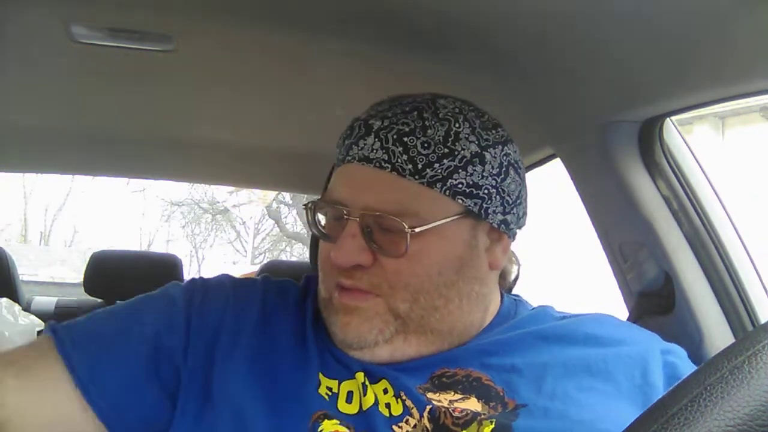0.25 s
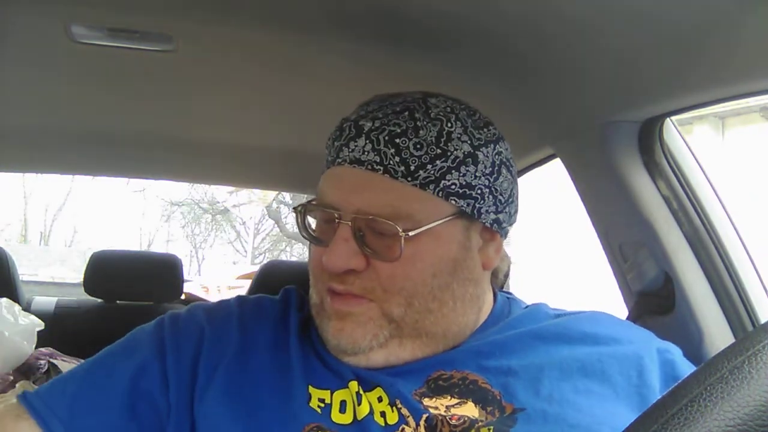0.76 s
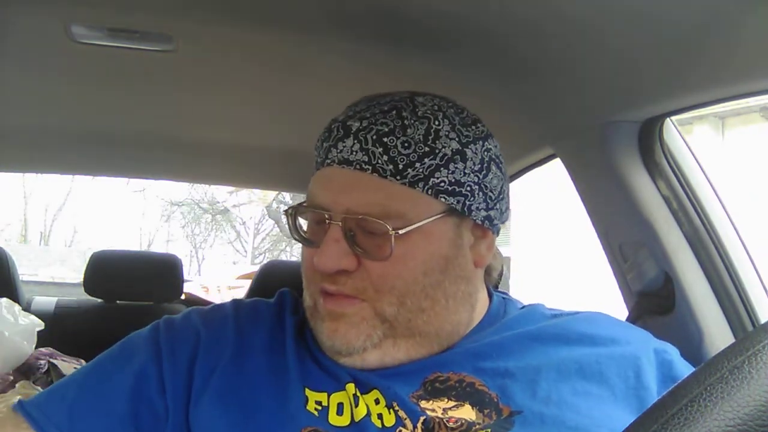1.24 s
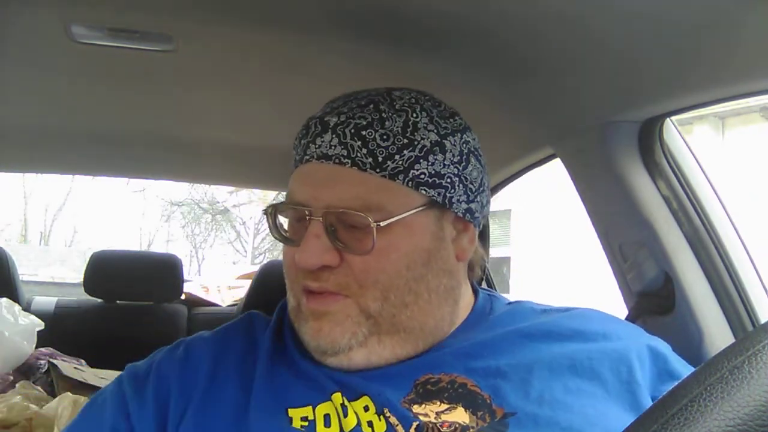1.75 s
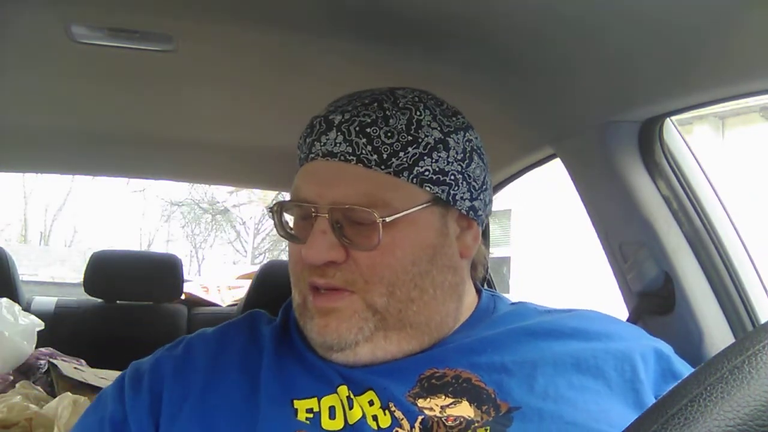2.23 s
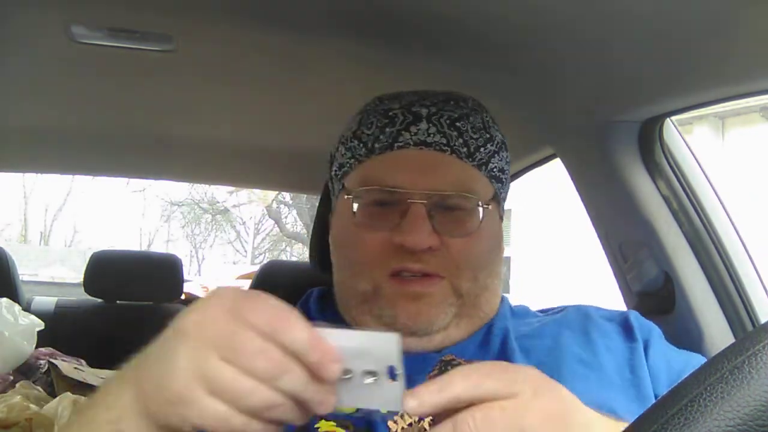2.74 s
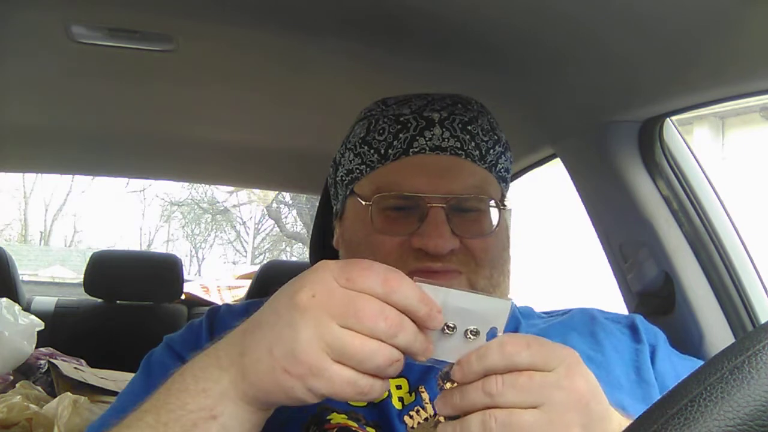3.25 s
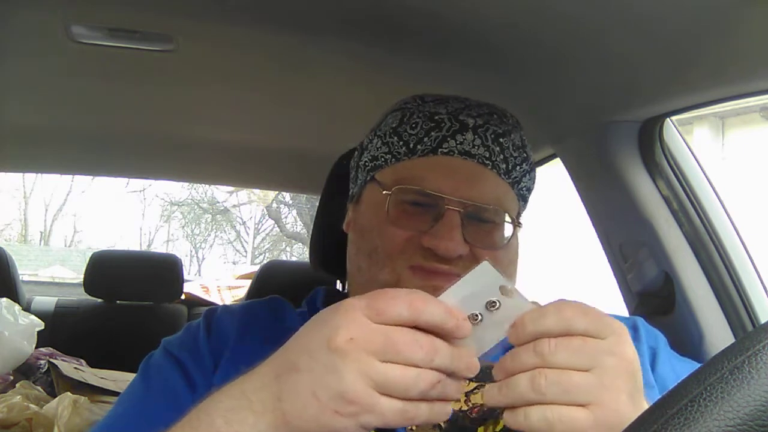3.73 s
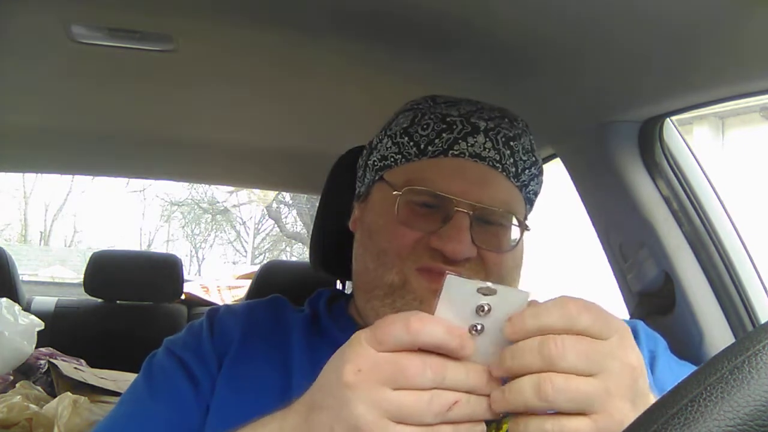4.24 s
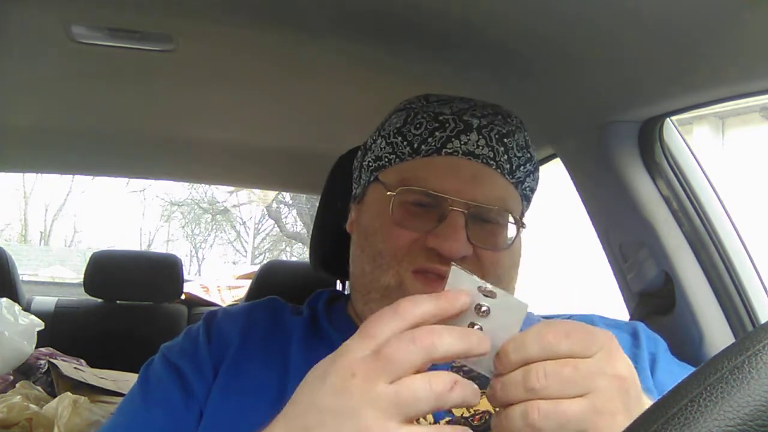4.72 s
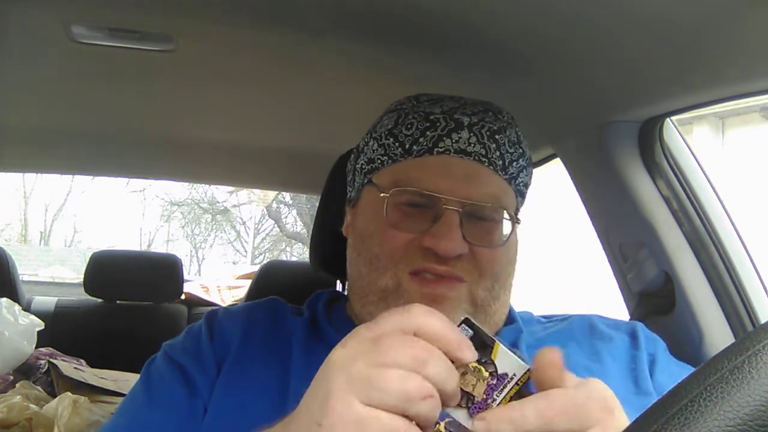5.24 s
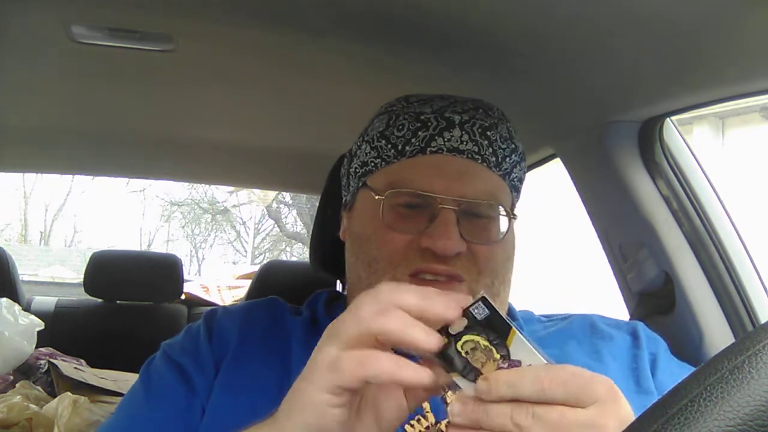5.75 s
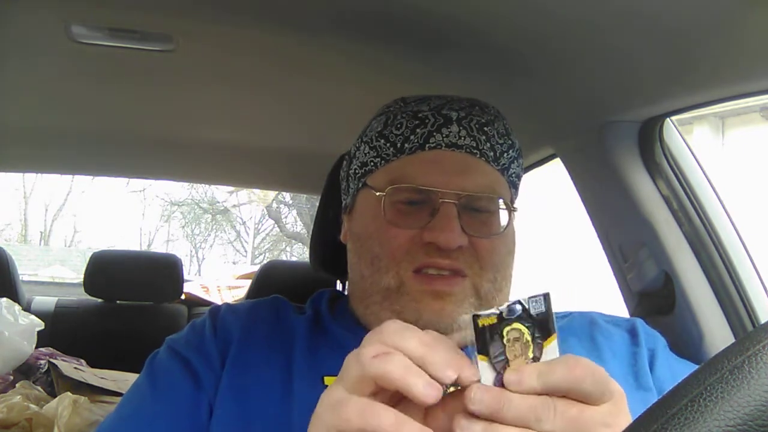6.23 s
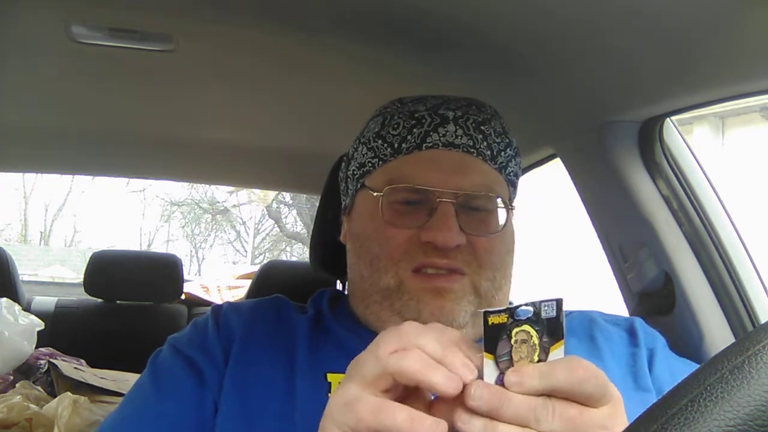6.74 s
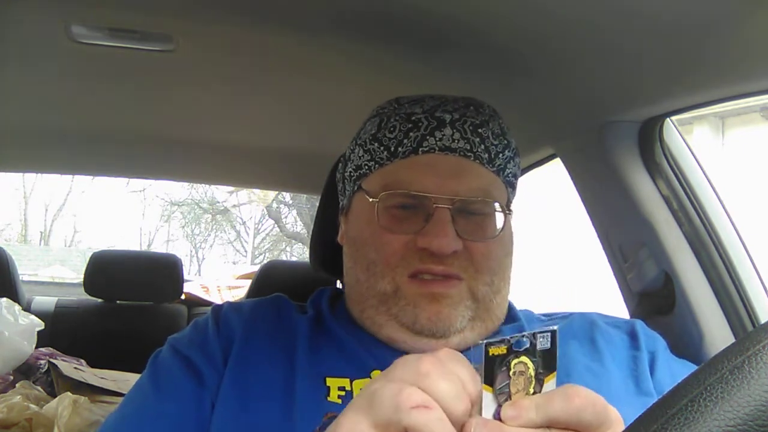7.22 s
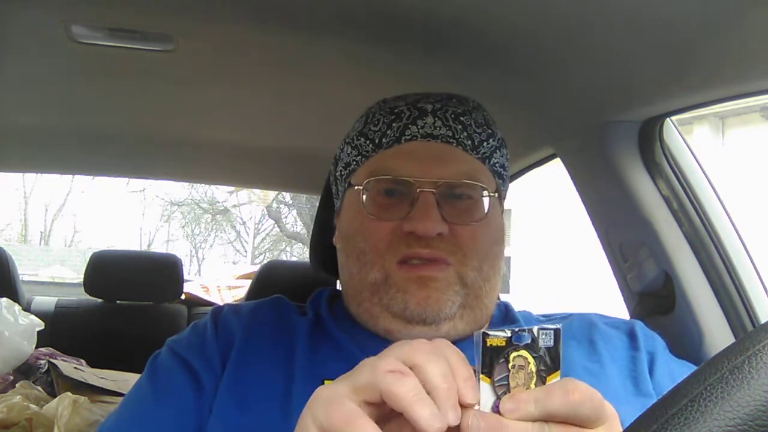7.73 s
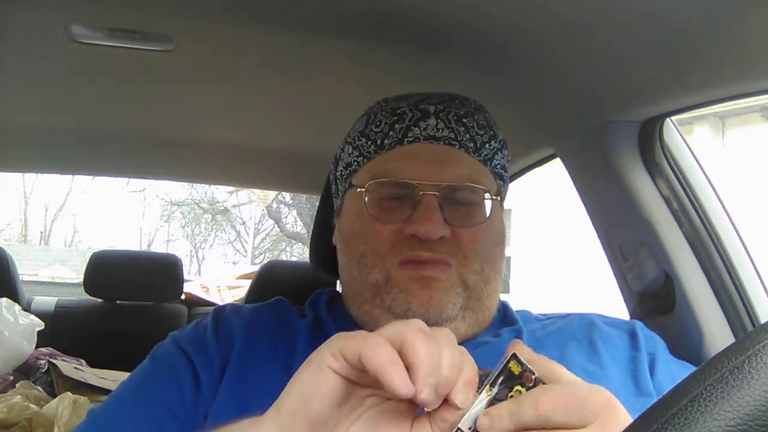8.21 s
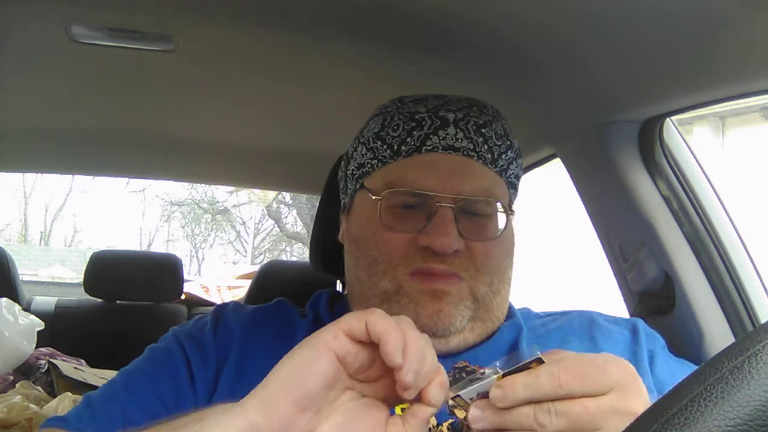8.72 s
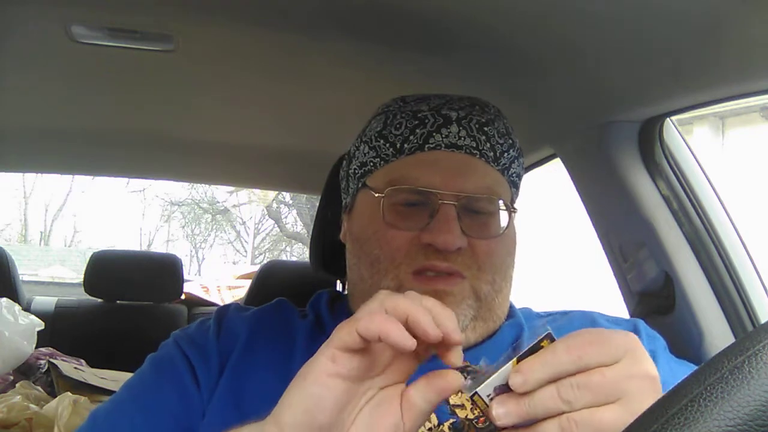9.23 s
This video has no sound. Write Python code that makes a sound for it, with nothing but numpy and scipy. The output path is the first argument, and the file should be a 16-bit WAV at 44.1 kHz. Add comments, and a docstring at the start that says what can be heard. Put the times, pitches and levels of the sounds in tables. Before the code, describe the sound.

Small plastic wrapper crackles and snaps in irregular bursts as hands work it open inside a quiet parked car, after a few dull knocks.

```python
"""A small card's plastic wrapper snaps and crackles as hands work it open in a parked car.
Each crease is a spike with a quick spray of noise; sliding film is a dense train of tiny slips.
In the first two seconds or so, among the first creases, hands also knock on seat and console (noise bursts
with decaying modes) and an arm brushes the seat; this, a sleeve, a thumb and the cabin are filtered noise.
All is heard by two microphone ports near the dashboard, alike in the bass and unlike in the treble."""
import sys
import numpy as np
from scipy import signal
from scipy.fft import rfft, irfft, next_fast_len
from scipy.io import wavfile
from scipy.ndimage import uniform_filter1d

SR = 44100
rng = np.random.default_rng(int(sys.argv[2]) if len(sys.argv) > 2 else 0)


def wav_record(signal):
    """Record a signal, one row per channel, as 16-bit PCM in the file named by sys.argv[1]."""
    frames = np.transpose(np.atleast_2d(signal))
    bounded = np.clip(frames, -1, 1)
    # unit amplitude maps onto the largest positive 16-bit level
    quanta = np.round(bounded * 32767).astype(np.int16)
    wavfile.write(sys.argv[1], SR, quanta)


N = 417627
TIME = np.arange(N) / SR
# the wrapper is held and fingered lightly between these times [s]
HELD_FROM_S, HELD_TO_S = 3.6, 7.1


def undb(db):
    """Amplitude ratio: 20 dB is a factor of ten."""
    return 10 ** (np.asarray(db) / 20)


def unit(x):
    """Normalisation to a root mean square of 1."""
    return x / np.sqrt(np.mean(x ** 2))


def colour(points, hz):
    """Spectral envelope: gain from (frequency [Hz], level [dB]) points joined on a log frequency axis."""
    f, db = np.transpose(points)
    return undb(np.interp(np.log(hz + 1), np.log(f), db))


def bins(size):
    """Fourier frequencies [Hz] of a real spectrum."""
    return np.fft.rfftfreq(next_fast_len(size), 1 / SR)


def shaped(x, gain):
    """Linear filtering: multiplication of the spectrum by a gain per frequency."""
    size = next_fast_len(x.shape[-1])
    return irfft(rfft(x, size) * gain, size)[..., :x.shape[-1]]


def causal(gain):
    """Minimum-phase response by cepstral folding, so that nothing sounds before the blow."""
    cepstrum = irfft(np.log(gain + 1e-5))
    half = cepstrum.shape[-1] // 2
    cepstrum[..., 1:half] *= 2
    cepstrum[..., half + 1:] = 0
    return np.exp(rfft(cepstrum))


def ports(x, alike_hz=1900, lag_ms=0.2707):
    """Spatial coherence: two unrelated signals become alike in the bass, with a time lag at the left port."""
    hz = bins(x.shape[-1])
    size = next_fast_len(x.shape[-1])
    alike = 1 / (1 + (hz / alike_hz) ** 2)
    left, right = rfft(x, size)
    left = alike * right + np.sqrt(1 - alike ** 2) * left
    left = left * np.exp(-2j * np.pi * hz * lag_ms / 1000)
    return irfft(np.array([left, right]), size)[:, :x.shape[-1]]


def swell(start, length, attack_s, t60):
    """Gesture envelope: a linear rise that ends at the start, a hold, then exponential decay."""
    rise = np.clip(1 + (TIME - start) / attack_s, 0, 1)
    return rise * 1000 ** -np.clip((TIME - start - length) / t60, 0, 3)


def wander(rate):
    """Slow random modulation: normal draws at a rate [Hz], joined by straight lines."""
    steps = np.arange(0, N / SR, 1 / rate)
    return np.interp(TIME, steps, rng.standard_normal(N)[:len(steps)])


def add(out, s, sound):
    """Superposition: a sound is mixed in at time s."""
    i = min(max(int(s * SR), 0), N - 1)
    out[:, i:i + sound.shape[1]] += sound[:, :N - i]


def wrapper(hz):
    """Radiation of film and card: a broad spectrum raised or lowered by resonances, at unit mean power."""
    # colour of the film: (frequency [Hz], relative level [dB])
    film_colour = [(150, -61), (250, -29.5), (510, -21), (615, -14), (729, -24.5), (850, -19.5),
                   (1440, -10), (2310, -4.5), (2990, -12.5), (3360, -9), (4410, -5.5), (6530, 1.5),
                   (12200, -2), (13500, -3.5), (14500, -13)]
    # resonances of the card in the cupped hands: (frequency [Hz], width [Hz], gain [dB])
    card_modes = [(640, 200, 2.5), (870, 44, 3.5), (1444, 460, -7.5), (2400, 480, -2), (6600, 300, 1.5)]
    resonance_db = sum(db / (1 + (2 * (hz - f) / width) ** 2) for f, width, db in card_modes)
    bass_cut = hz ** 2 / (hz ** 2 + 180 ** 2)
    return unit(colour(film_colour, hz) * undb(resonance_db) * bass_cut)


def facet(hz, swing_db=5, width=0.057, count=14):
    """Local resonance: a patch of bent film has peaks and dead spots, each a given share of its pitch wide."""
    draws = rng.random((count, 2))
    centres = 1100 * (14000 / 1100) ** draws[:, :1]
    peaks = 1 / (1 + ((hz - centres) / (centres * width / 2)) ** 2)
    gain = undb(swing_db * np.cos(np.pi * draws[:, 1]) @ peaks)
    # the resonances only share out the energy of their part of the spectrum
    return gain / np.sqrt(uniform_filter1d(gain ** 2, len(hz) // 9))


def stutter(hz, spread_ms=2.8, slip_db=-10, count=3):
    """Interference of delayed slips: smaller ones crowd round the main one, tending to come after it."""
    delays_s = (rng.standard_normal((count, 1)) + 1 / 2) * spread_ms / 1000
    delayed = np.exp(-2j * np.pi * hz * delays_s)
    slips = 1 + undb(slip_db) * rng.standard_normal(count) @ delayed
    return slips / np.sqrt(np.mean(np.abs(slips) ** 2))


def crack(t60, tail_db, tail_t60, direct=0.6, patchy_db=0.5, size=8192):
    """Two-stage decay: a snap's spike and lumpy quick spray of noise, then a faint, slower-fading tail."""
    t = np.arange(size) / SR
    lumps = undb(patchy_db * np.repeat(rng.standard_normal((2, size // 16)), 16, axis=1))
    fall = undb(-60 * t / t60)
    early = rng.standard_normal((2, size)) * unit(lumps) * fall
    early[:, 2] += direct * np.array([1, 2])
    early *= np.sqrt(np.sum(fall ** 2) / np.sum(early ** 2, axis=1, keepdims=True))
    tail = undb(tail_db - 60 * t / tail_t60) * rng.standard_normal((2, size))
    return ports(early + tail)


def ticks(per_s=5, level_db=-51, spread_db=-0.5, middle_db=-5, body_db=-8, pan_db=3):
    """Poisson process: small stray creases at random moments of holding, as rows like those of the snaps."""
    chance = rng.standard_normal((128, 2))
    times = HELD_FROM_S + np.cumsum(rng.exponential(size=128)) / per_s
    return [(s, level_db + spread_db * a, middle_db, body_db, pan_db * b)
            for s, (a, b) in zip(times, chance) if s < HELD_TO_S]


def snaps(size=8192):
    """Buckling: each crease gives way as an impulse and drives film and card by its own spectrum."""
    # the creases that stand out:
    # (time [s], relative level [dB], middle band [dB], card body [dB], left minus right [dB])
    creases = [(0.15, -28.5, 0.5, 1.5, 3.5), (0.3092, -25.5, 4, 4, 7), (0.461, -41, -3, -28, 17),
               (0.6206, -40, -24, -8, -4), (1.261, -28, -1, 11.5, 9), (1.2931, -21, -5, 7, -8.5),
               (1.2996, -18, 6, 9.5, -1), (1.346, -38.5, -3.5, -7, 2.5), (1.4499, -33.5, 2, -11, 4),
               (1.525, -38, -11, -17, 6), (1.7184, -37.5, -1, 11.5, 3), (1.7475, -20, 3, -1, 3.5),
               (1.8923, -26, -11, -3, -1.5), (2.001, -26, 3.5, 5, 1.5), (2.038, -25, -11, -14.5, 5.5),
               (2.06, -21.5, 1, -9.5, -2), (2.0872, -21, -1, 2.5, 6), (2.103, -18, -4.5, 3.5, 3.5),
               (2.1621, -16.5, -7.5, -2, 4), (2.2232, -27.5, -18, -4, -1.5),
               (2.3757, -24.5, -10.5, -13.5, -3), (2.5336, -48.5, -4, 6, 7), (2.9658, -30, 0.5, 10, 4),
               (3.046, -21.5, -2, -19, -3), (3.5094, -38.5, 1, 14.5, 0.5), (3.5384, -35, 8, 6, 2),
               (3.6108, -36.5, 9, -5, 1), (3.7132, -23, -1, 1, -2.5), (3.8211, -31.5, 10.5, 8.5, -2),
               (3.842, -42, 17.5, 8, 8.5), (3.888, -38, 2.5, 1, 2), (4.0272, -35, 2, -7, 3),
               (4.2478, -31, 5, -5, 1.5), (4.3124, -23.5, 1.5, 3, -1.5), (4.333, -29, 9, 5, -1),
               (4.4514, -27.5, 2.5, -10, 7.5), (4.607, -39, -1, 5, 2), (4.637, -30.5, 7.5, 12.5, 2.5),
               (4.6825, -24, 2.5, -2.5, 0), (4.856, -22, -4.5, -14, 1), (4.9195, -19.5, -10, -2.5, -1.5),
               (5.0012, -30, -11.5, -9, -0.5), (5.1388, -24.5, -0.5, 3.5, -1.5), (5.1947, -16, 2, -5, -2),
               (5.26, -25.5, -2.5, -10, 2.5), (5.3233, -18, -7, -5.5, -2.5), (5.3414, -22, -6, -20, -3),
               (5.4602, -36.5, -12, 4.5, 0), (5.5945, -23, -12, -15, -12), (5.619, -26.5, -5, -22, -0.5),
               (5.6671, -31, -7, 9, -3), (5.6916, -24.5, 5, 2.5, 0), (5.7671, -35, -1, -6, -1),
               (5.8342, -31, -8, -10, 2), (5.8865, -24.5, -8, -22, -2), (5.942, -27.5, -17, 6, 0),
               (5.9663, -29.5, 5, 7, -2.5), (6.0935, -19, -1, 5.5, -2), (6.137, -15, -7, -19, -4.5),
               (6.1657, -25, 4, -11, -5.5), (6.1983, -16.5, -4, -12.5, -6), (6.254, -19.5, -3, -15.5, -2),
               (6.2786, -17.5, 0, -5, -0.5), (6.351, -20, -6, 3.5, -4), (6.388, -18.5, 0.5, 8, -7),
               (6.4059, -17.5, 4, 3, -2), (6.4628, -32, -4, -10, 4), (6.5248, -20, -0.5, 11, -4.5),
               (6.5408, -21, -16, 4.5, -4), (6.5746, -24, 6.5, 2.5, -2), (6.5932, -27, -4, -4.5, -8.5),
               (6.6218, -16, -3.5, -12, -1.5), (6.6738, -31.5, -4, -3.5, -2),
               (6.7505, -26.5, -4.5, -28, -1), (6.7645, -27.5, -13.5, -16, 3.5),
               (6.796, -18.5, -15, -28.5, 2), (6.821, -16.5, -6, -20, -1), (6.843, -21, -1.5, -24, -3),
               (6.9136, -19.5, -4.5, -5, -4.5), (7.044, -27, -11, -20, 0), (7.0534, -15, 1.5, 4.5, 1.5),
               (7.0826, -22.5, -11.5, -6, -6), (7.277, -35.5, -9, -14, -6), (7.326, -32, -5.5, -19, -6),
               (7.3526, -27, -16, 5.5, -9), (7.42, -22.5, -33, -30, -6), (7.4638, -21.5, -9, -4.5, -1),
               (7.5152, -35, -18, -23, -2), (7.5693, -24.5, -50, -30, -0.5), (7.75, -29.5, -2, 11.5, -6),
               (7.7978, -25, -32, -30, 2), (7.944, -47, -12, -10, 0), (8.0295, -40, 5, 3.5, 4),
               (8.1138, -31, 0.5, 4, 0.5), (8.2068, -32.5, -6, -26, -1), (8.3041, -38.5, -9, -8.5, 0.5),
               (8.4424, -17.5, -0.5, -9, -3), (8.4677, -24, -11, 12.5, -8), (8.5478, -24, -0.5, 2, -4.5),
               (8.5882, -16.5, -5, 7.5, -4.5), (8.6623, -23, 7, 7, -2), (8.7364, -23, 3.5, 8.5, -1.5),
               (8.818, -37, 0, -3, 5), (8.8603, -19, 5, 8.5, -0.5), (8.9826, -17.5, 1, 1, 0.5),
               (9.0797, -23, -1, 5.5, -2.5), (9.1564, -34.5, -9, -8, -2), (9.4046, -34, -0.5, 7, -1.5)]
    out, hz, lead = np.zeros((2, N)), bins(size), size // 16
    film = wrapper(hz)
    for s, db, middle_db, body_db, pan_db in creases + ticks():
        bands = [(1400, body_db), (2300, middle_db), (3700, middle_db), (5200, 0.00051)]
        snap = crack(t60=0.059, tail_db=-31.5, tail_t60=0.43, direct=0.71, patchy_db=3.5)
        radiation = film * facet(hz, swing_db=5.5, width=0.047) * colour(bands, hz)
        snap = shaped(snap, causal(radiation) * stutter(hz))
        snap = np.roll(snap, lead, axis=1)  # room for the slips before the main one
        pan = np.array([[pan_db], [-pan_db]]) / 2
        add(out, s - lead / SR, snap * undb(db + pan))
    return out


def pull(held_db=-64, attack_s=0.012, t60=0.051, settle_db=-15, settle_t60=0.4):
    """Energy addition: the powers of all strokes sum to the levels of the film and of the card it drives."""
    # strokes of the fingers that slide or tear the film:
    # (start [s], length [s], relative level [dB], card body [dB])
    strokes = [(0.148, 0.1, -48.5, 7), (0.272, 0.13, -35.5, 7), (0.45, .16, -53, -0.5),
               (0.734, 0.056, -65, 14.5), (0.877, 0.054, -60.5, 14.5), (1.189, 0.014, -57.5, 18.5),
               (1.239, 0.12, -47, 12), (1.412, 0.071, -42, 2.5), (1.742, 0.055, -38.5, 9.5),
               (1.884, 0.024, -37.5, 2.5), (2.027, 0.15, -29, 3.5), (2.227, 0.076, -57.5, -4),
               (2.8, 0.016, -38, 4), (2.843, 0.051, -52.5, 2), (2.971, 0.026, -37.5, 2.5),
               (3.294, 0.0079, -47, -3.5), (3.801, 0.12, -59, 9.5), (4.073, 0.049, -57.5, 3.5),
               (4.226, 0.13, -49, 5.5), (4.398, 0.089, -38.5, 4.5), (4.532, 0.21, -52, 4.5),
               (4.815, 0.14, -49, 5), (5.119, 0.15, -41.5, 0), (5.189, 0.023, -22.5, 3),
               (5.291, 0.091, -42, -6.5), (5.506, .035, -37.5, 0), (5.587, .09, -56, 11.5),
               (5.842, 0.047, -32.5, 0), (5.942, 0.038, -39.5, 6.5), (6.068, 0.072, -35.5, 2.5),
               (6.2, 0.13, -32, 3), (6.352, 0.081, -34.5, 7), (6.516, 0.12, -47, 14),
               (6.908, 0.064, -38, 3), (7.046, 0.064, -46, 1), (7.221, 0.18, -51.5, -2.5),
               (7.353, 0.043, -36.5, 7.5), (7.439, 0.03, -36, 1), (7.737, 0.063, -46.5, 4),
               (7.988, 0.012, -53, 1.5), (8.041, 0.21, -53.5, -0.5), (8.371, 0.014, -34, -1),
               (8.421, 0.092, -37, 9), (8.574, 0.045, -26.5, 6.5), (8.665, 0.046, -38, 5),
               (8.831, .1, -39.5, 7), (8.97, 0.0081, -36, 6), (9.034, 0.073, -39, 5.5),
               (9.437, .035, -34, 6.5)]
    film = undb(2 * held_db) * ((TIME > HELD_FROM_S) & (TIME < HELD_TO_S)) + 1e-14
    card = film.copy()
    for s, length, db, body_db in strokes:
        stroke = swell(s, length, attack_s, t60)
        settling = undb(settle_db) * swell(s, length, attack_s, settle_t60)
        power = (undb(db) * (stroke + settling)) ** 2
        film = film + power
        card = card + power * undb(2 * body_db)
    return np.sqrt(film), np.sqrt(card)


def crackle(gain_db=-1, rate=900, spread_db=5, even_s=0.026, body_hz=3800, hold_s=0.012, count=8):
    """Stick-slip: tiny slips of very unequal size hop between spots, each with its own resonances."""
    film_level, card_level = pull()
    happens = rng.random(N) < rate / SR  # rate is slips per second
    slips = happens * undb(spread_db * rng.exponential(size=N)) * rng.choice([-1, 1], N)
    # the pull of the fingers sets how much energy the slips share
    slips /= np.sqrt(np.abs(uniform_filter1d(slips ** 2, int(even_s * SR))) + 1e-9)
    slips *= film_level * undb(gain_db)
    spot = rng.integers(0, count, N)[(TIME / hold_s).astype(int)]
    body = card_level / film_level
    out = 0
    for k in range(count):
        ring = crack(t60=0.041, tail_db=-32.5, tail_t60=0.11)
        ring /= np.sqrt(np.sum(ring ** 2) / 2)
        hz = bins(ring.shape[1])
        film = unit(wrapper(hz) * facet(hz))
        low = 1 / (1 + (hz / body_hz) ** 8)
        # the card carries the low share of the power, the film the rest
        for drive, share in ((body, low), (1, 1 - low)):
            response = shaped(ring, causal(film * np.sqrt(share)))
            train = (slips * drive * (spot == k))[None]
            out = out + signal.oaconvolve(train, response, axes=1)[:, :N]
    return out


def thumb(s=4.645, hz=270, width_hz=130, db=-53, length_s=0.013):
    """Resonant noise under a Gaussian envelope: a thumb bumps the card in a soft, rounded push."""
    noise = ports(rng.standard_normal((2, N)), alike_hz=900)
    hollow = unit(shaped(noise, 1 / (1 + (2 * (bins(N) - hz) / width_hz) ** 2)))
    return undb(db) * hollow * np.exp(-((TIME - s) / length_s) ** 2 / 2)


def knocks(gain_db=-3, t60=0.085, tail_db=-17, tail_t60=0.28, bass_db=9, body_db=3, clack_db=9, size=16384):
    """Impact and modal decay: dull blows on seat and console, a short clatter with the ringing console."""
    # blows, all levels relative:
    # (time [s], level [dB], bass [dB], body [dB], clack [dB], console ring [dB])
    blows = [(0.152, -10.5, -29, -12.5, -9.5, -11), (0.352, -11, -30.5, -6.5, -12, -10),
             (0.963, -21.5, -31, -12.5, -23.5, -8.5), (1.085, -21, -19.5, -6.5, -4, -21.5),
             (1.241, -34.5, -4, -15.5, -1, -8), (1.269, -28, -15, -5, -4.5, -6.5),
             (1.298, -25, -11, -8, -7.5, -12.5), (1.415, -19, -9, -14.5, -11.5, -4.5),
             (1.452, -47, -8, -5, 8, -5), (1.747, -23, -17.5, -6, -12.5, -12.5),
             (1.768, -34, -12.5, -3.5, 0, -31), (2.102, -27.5, -20, -13, 1, -16.5),
             (2.125, -23, -13.5, -11, -9, -5)]
    # modes of the console: (frequency [Hz], relative level [dB], decay time t60 [s])
    console_modes = [(69.6, -11, 0.24), (162, -17.5, 0.37), (237, 5.5, 0.065), (295, -1.5, 0.12),
                     (410, -7.5, 0.14), (495, -0.5, 0.032), (561, -11.5, 0.3), (732, -3.5, 0.064),
                     (887, -8, 0.12), (1050, -31.5, 0.35)]
    # colour of a blow: (frequency [Hz], relative level [dB])
    blow_colour = [(30, -32), (55, -12.5), (120, 5), (165, 0.5), (300, -0.5), (370, -16), (480, 5),
                   (660, -18), (1150, -15.5), (2200, -21.5), (8000, -41)]
    out, hz, t = np.zeros((2, N)), bins(size), np.arange(size) / SR
    fall = undb(-60 * t / t60) + undb(tail_db - 60 * t / tail_t60)
    fade_out = np.minimum(1, 2 * (1 - t / t[-1]))
    for s, db, bass, body, clack, ring_db in blows:
        clatter = ports(rng.standard_normal((2, size)) * fall, alike_hz=650, lag_ms=-0.33)
        clatter = shaped(clatter, causal(unit(colour(blow_colour, hz))))
        clatter *= np.sqrt(np.sum(undb(-120 * t / t60)) * 2 / np.sum(clatter ** 2))
        ring = sum(undb(g - 60 * t / decay) * np.sin(2 * np.pi * f * t) * rng.choice([-1, 1])
                   for f, g, decay in console_modes)
        contact = [(110, bass + bass_db), (200, body + body_db), (600, body + body_db), (950, clack + clack_db)]
        blow = shaped(clatter + undb(ring_db) * ring / 2, causal(colour(contact, hz)))
        add(out, s, undb(db + gain_db) * blow * fade_out)
    return out


def seat(rough_db=4.5, rate=60, attack_s=0.025, t60=0.077):
    """Friction noise: an arm scuffs the upholstery in uneven grips; its weight thuds deep in the cushion."""
    # colour of the scuffs: (frequency [Hz], relative level [dB])
    scuff_colour = [(60, -20), (150, -5.5), (230, 5), (330, 2), (430, -20), (520, -10), (680, -27),
                    (1100, -14.5), (1600, -27.5), (3000, -59.5)]
    # an arm brushing the seat: (start [s], length [s], relative level [dB])
    scuffs = [(0.185, 0.035, -48), (0.3, .16, -51.5), (0.51, 0.081, -62), (0.75, 0.16, -58),
              (1.18, 0.27, -63), (1.75, 0.079, -58.5), (1.995, 0.21, -61.5)]
    # its weight pressing into the cushion: (start [s], length [s], relative level [dB])
    pushes = [(0.162, 0.058, -50), (0.29, 0.16, -52), (0.57, .06, -67.5), (1.11, 0.095, -57.5),
              (1.441, 0.045, -67), (1.761, .075, -55), (1.91, 0.036, -59.5), (2.131, 0.058, -46)]
    cushion = [(20, -27.5), (45, -1.5), (70, -2.0), (120, -4.5), (220, -28.5), (500, -75.5)]
    grip = wander(rate)
    out = 0
    for points, moves in ((scuff_colour, scuffs), (cushion, pushes)):
        noise = ports(rng.standard_normal((2, N)), alike_hz=700, lag_ms=-0.52)
        noise = unit(shaped(noise, colour(points, bins(N))))
        out = out + noise * sum(undb(db) * swell(s, length, attack_s, t60) for s, length, db in moves)
    return out * undb(rough_db * grip)


def sleeve(s=0.96, length_s=0.38, db=-62, hz=7000, width_hz=2600, attack_s=0.26, t60=0.3):
    """Band-limited friction noise: a sleeve slides over the seat in a smooth swish that swells slowly."""
    noise = ports(rng.standard_normal((2, N)))
    cloth = unit(shaped(noise, 1 / (1 + (2 * (bins(N) - hz) / width_hz) ** 2)))
    return undb(db) * cloth * swell(s, length_s, attack_s, t60)


def cabin(level_db=-74.5, wander_db=2, rate=7):
    """Stationary coloured noise: faint hiss of the closed car over a rumble that wanders a little."""
    # steady background: (frequency [Hz], relative level [dB])
    cabin_colour = [(15, -31), (28, -11), (45, 1.5), (75, 2.5), (140, -3.5), (210, -3), (378, -14.5),
                    (580, -17.5), (3200, -20.5), (4300, -22.5), (10800, -24), (14500, -34)]
    noise = ports(rng.standard_normal((2, N)), alike_hz=250, lag_ms=0)
    noise = unit(shaped(noise, colour(cabin_colour, bins(N))))
    rumble = shaped(noise, 1 / (1 + (bins(N) / 250) ** 4))
    return undb(level_db) * (noise + rumble * (undb(wander_db * wander(rate)) - 1))


def scene():
    """Superposition of wrapper, knocks and seat over the quiet cabin."""
    return snaps() + crackle() + thumb() + knocks() + seat() + sleeve() + cabin()


def record(dry, top_hz=14400):
    """Transducer response: the ports differ in colour at constant total power gain; the top is cut steeply."""
    # difference of the two ports: (frequency [Hz], left minus right [dB])
    port_difference = [(60, 9), (110, -2.5), (200, -1.5), (370, 1.5), (690, -2), (1270, 5.5), (2330, 1.5),
                       (4290, 5.5), (7900, 2), (14500, -14)]
    ratio = colour(port_difference, bins(N))
    gains = np.array([ratio, np.ones_like(ratio)]) * np.sqrt(2 / (1 + ratio ** 2))
    steep_cut = signal.ellip(10, 0.2, 70, top_hz, fs=SR, output="sos")
    return signal.sosfilt(steep_cut, shaped(dry, gains))


dry = scene()
out = record(dry)
wav_record(out)
```